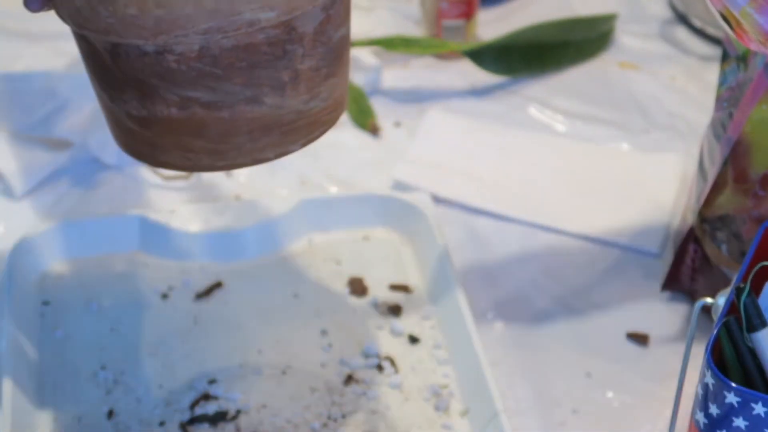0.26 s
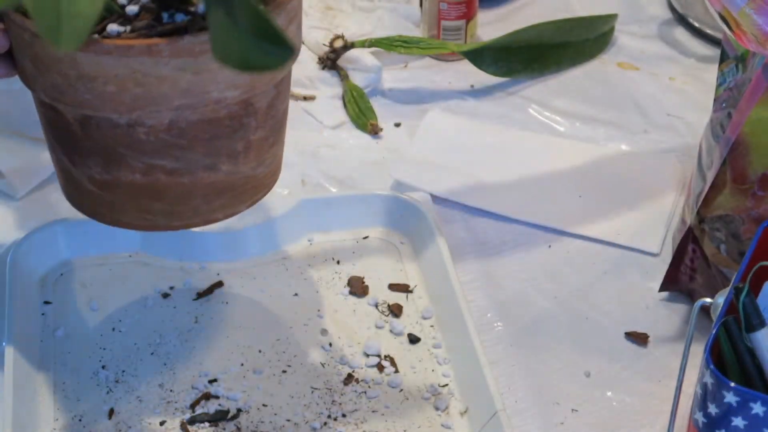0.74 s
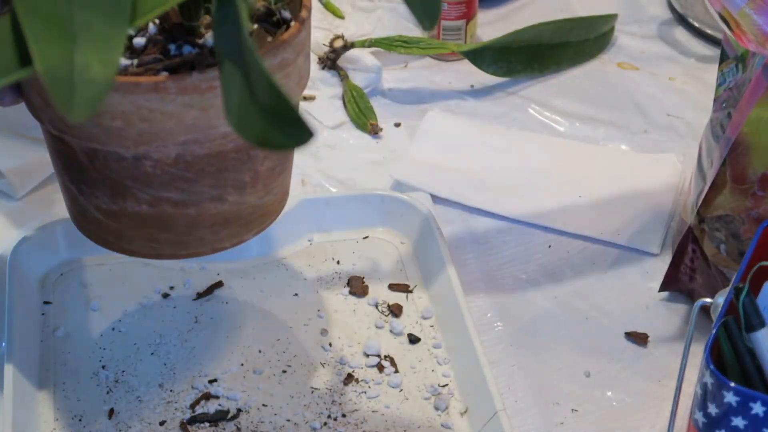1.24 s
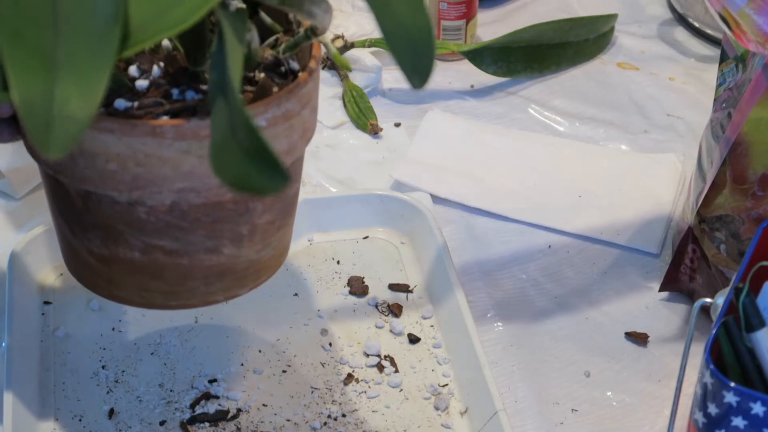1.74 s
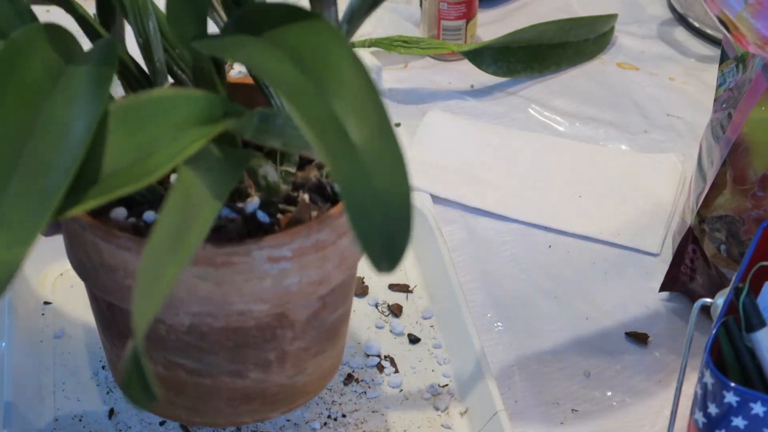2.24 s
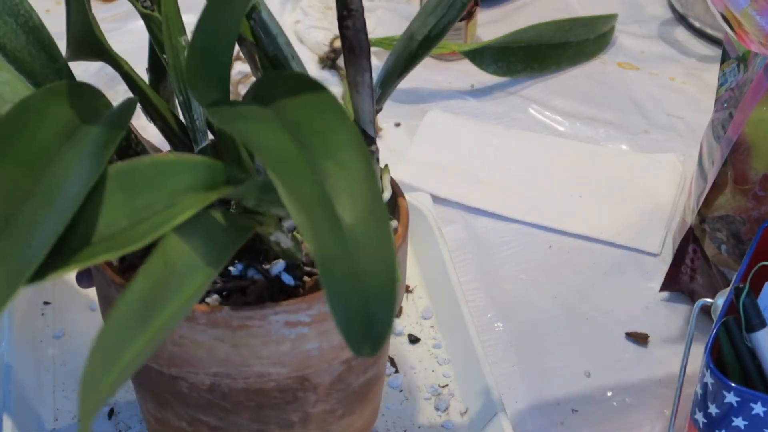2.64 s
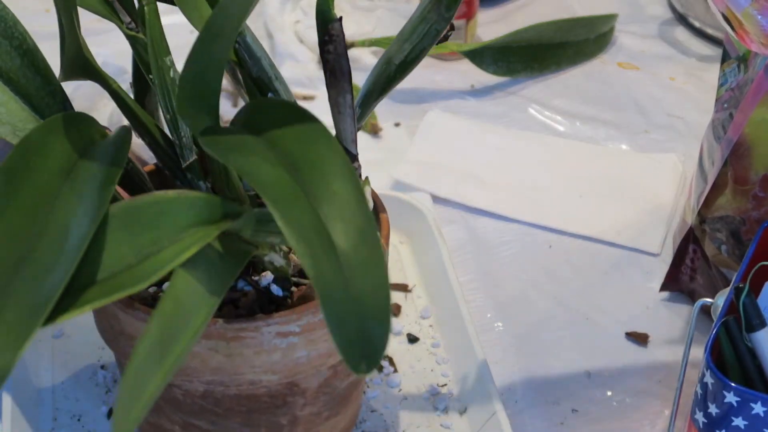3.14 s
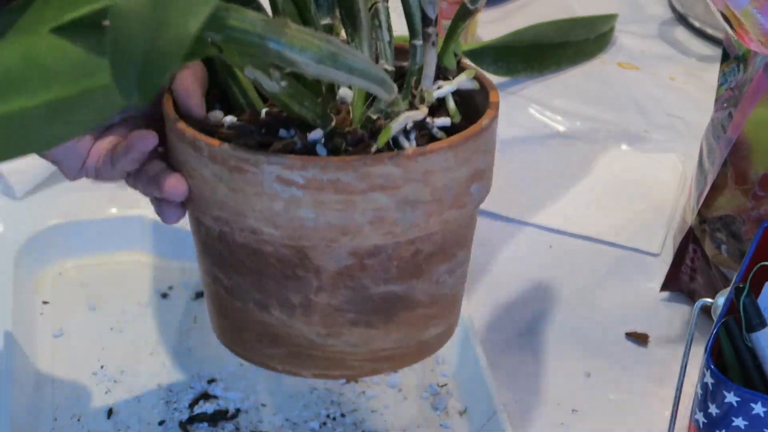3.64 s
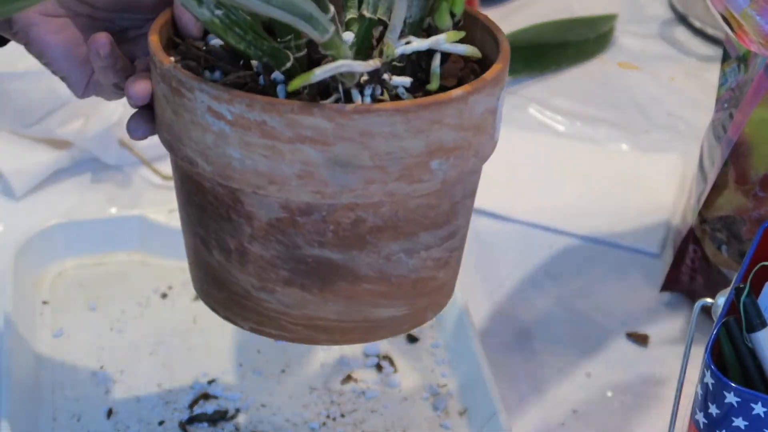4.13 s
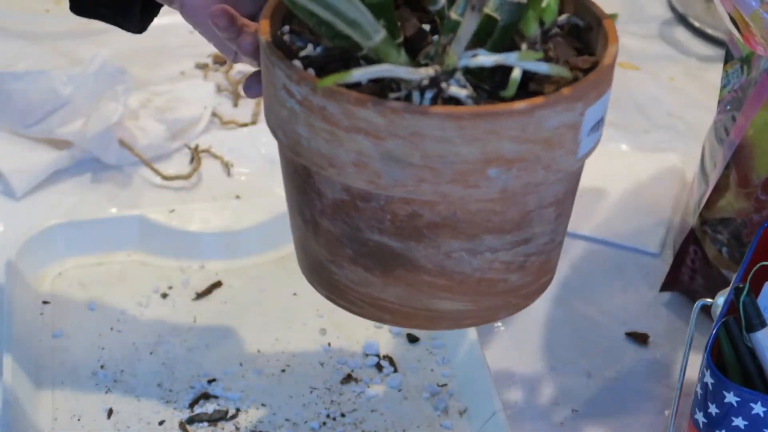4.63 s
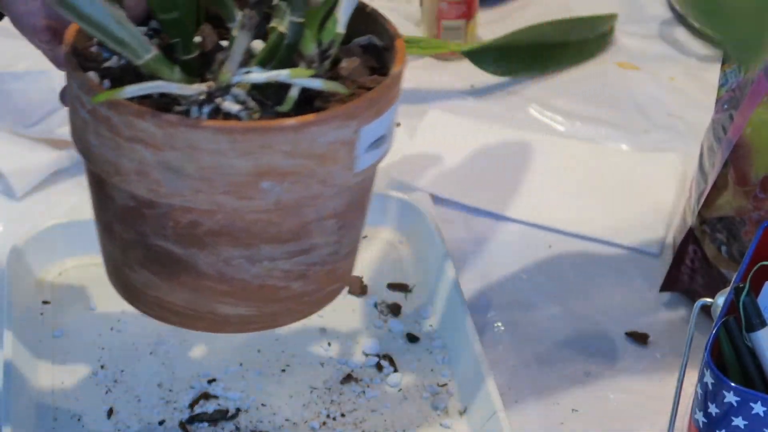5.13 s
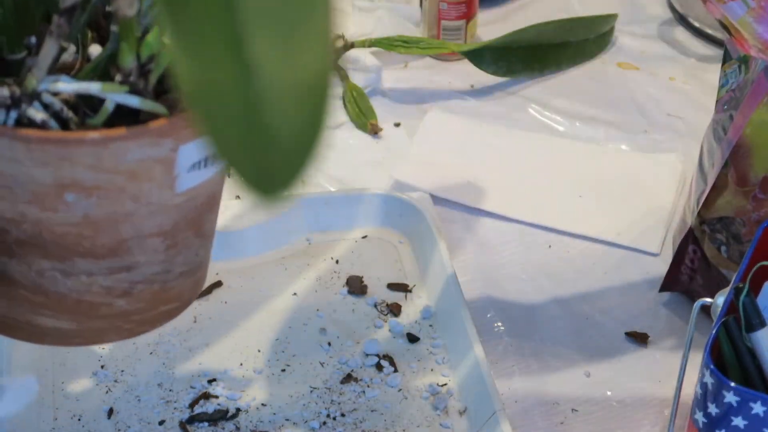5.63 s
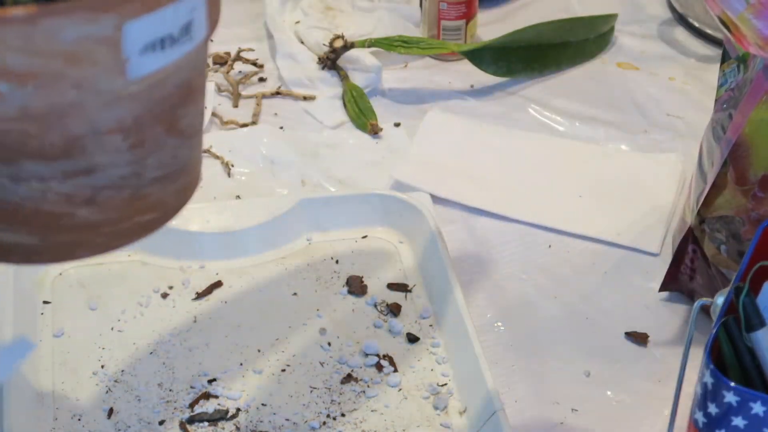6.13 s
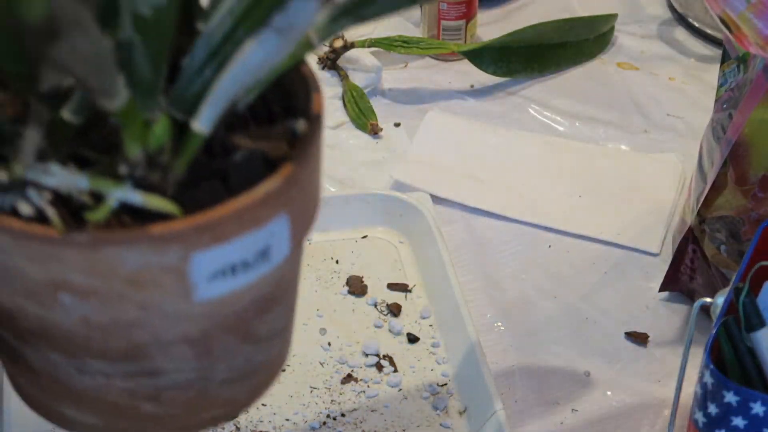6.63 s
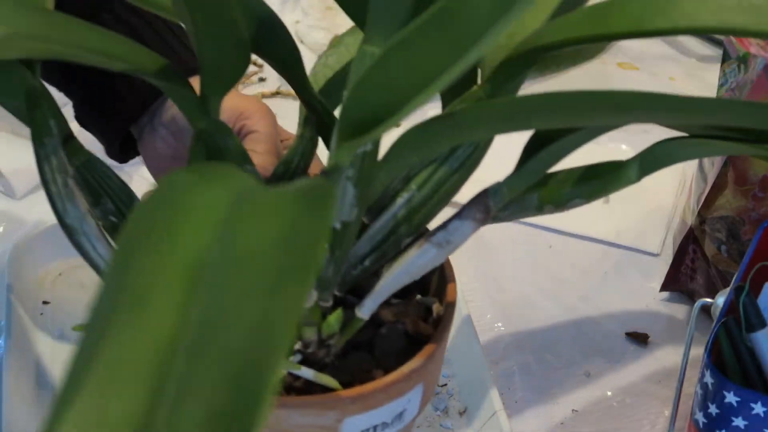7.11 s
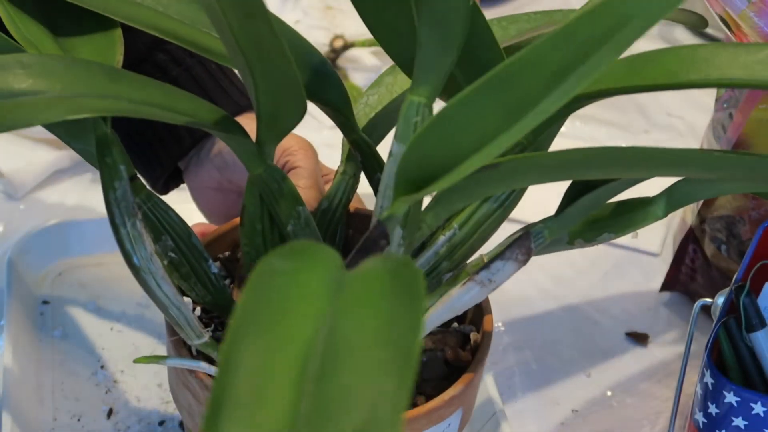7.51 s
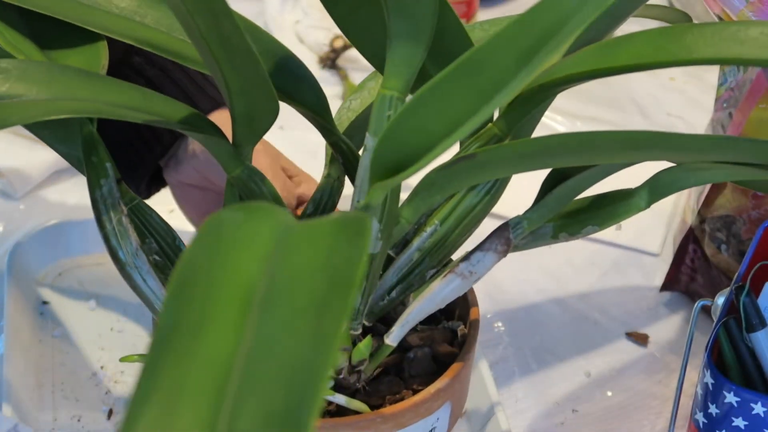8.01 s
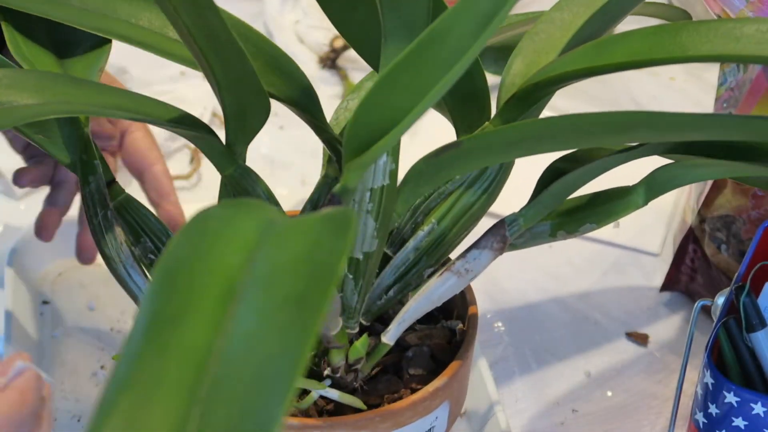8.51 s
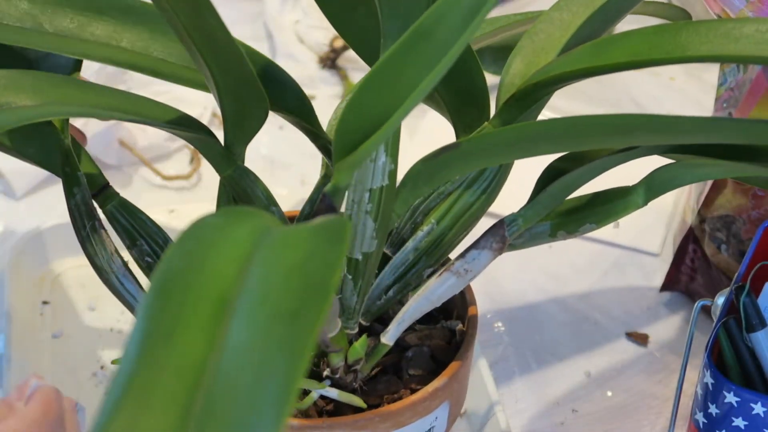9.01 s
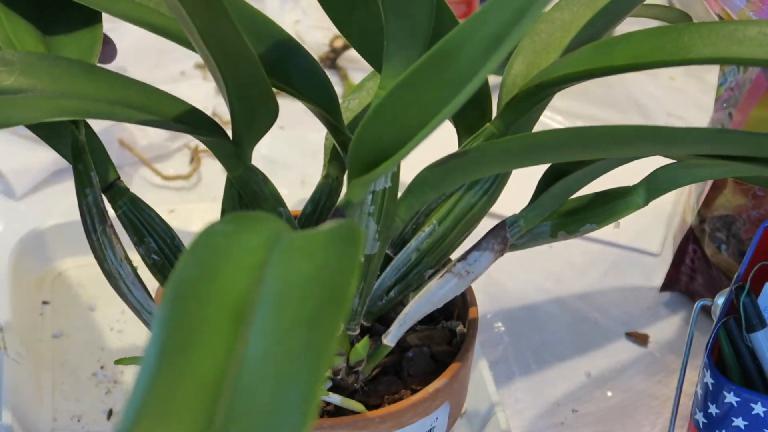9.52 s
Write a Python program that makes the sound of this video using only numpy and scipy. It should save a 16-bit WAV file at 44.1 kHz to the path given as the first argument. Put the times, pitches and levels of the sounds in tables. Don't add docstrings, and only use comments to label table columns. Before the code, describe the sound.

In a small room with a steady fan whirr and low mains hum, faint leaf brushes come first. A clay pot bumps and grates on a thin gritty plastic tray, then is lifted with small rattles and knocks. After a quiet gap it is set down with a rough scrape and two hard, bright clacks, leaving a few ticks and hum. Close stereo microphone.

```python
import sys
import numpy as np
from scipy import signal
from scipy.fft import rfft, irfft, next_fast_len
from scipy.io import wavfile
from scipy.ndimage import uniform_filter1d, map_coordinates

SR = 44100
rng = np.random.default_rng(int(sys.argv[2]) if len(sys.argv) > 2 else 0)


def invert_db(level):
    return 10 ** (np.asarray(level, dtype=float) / 20)


def put_to_file(sound):
    columns = np.atleast_2d(sound).T
    safe = np.clip(columns, -1, 1)
    whole_steps = np.round(safe * 32767)
    wavfile.write(sys.argv[1], SR, whole_steps.astype(np.int16))


N = 430416


def unit(x):
    return x / np.sqrt(np.mean(x ** 2) + 1e-20)


def along(points, hz):
    f, v = np.transpose(points)
    return np.interp(np.log(hz + 1), np.log(f + 1), v)


def wobble(rate_hz):
    coarse = np.arange(0, N + 32, 32)
    knots = rng.standard_normal(int(N * rate_hz / SR) + 4)
    return np.interp(np.arange(N), coarse, map_coordinates(knots, [coarse * rate_hz / SR]))


def filtered(x, response):
    m = next_fast_len(N + SR // 2)
    return irfft(rfft(x, m) * response(np.fft.rfftfreq(m, 1 / SR)), m)[..., :N]


def coloured(x, spectrum, body=()):
    hz = np.fft.rfftfreq(8192, 1 / SR)
    lifts_db = sum(lift / (1 + (2 * (hz - centre) / width) ** 2) for centre, width, lift in body)
    db = along(spectrum, hz) + lifts_db
    cepstrum = irfft(np.log(invert_db(np.maximum(db, -80))))
    cepstrum[1:4096] *= 2
    cepstrum[4097:] = 0
    return signal.fftconvolve(x, irfft(np.exp(rfft(cepstrum)))[:4096])[:N]


def patchy(x, depth_db, bins=5, frames=9):
    z = signal.stft(x, nperseg=512)[2]
    field = uniform_filter1d(rng.standard_normal(z.shape), bins, axis=0)
    field = uniform_filter1d(field, frames, axis=1)
    return signal.istft(z * invert_db(depth_db * unit(field)), nperseg=512)[1][:N]


def grains(rate_hz, spread_db, clump_db, smooth):
    size_db = spread_db * np.minimum(rng.exponential(size=N), 3)
    slips = (rng.random(N) < rate_hz / SR) * rng.choice([-1, 1], N) * invert_db(size_db)
    clumps = invert_db(clump_db * np.clip(wobble(60), -1.5, 1.5))
    return clumps * (unit(slips) + smooth * rng.standard_normal(N))


def strokes(rows, rise_db_s, stop_db_s, fade_db_s=0, second=False):
    out = np.zeros(N)
    for start_s, length_s, db, sag_db, *over_db in rows:
        first = round((start_s - 40 / rise_db_s) * SR)
        last = min(N, round((start_s + length_s + 40 / stop_db_s) * SR))
        i = np.arange(first, last)
        t = i / SR - start_s
        level_db = db + second * sum(over_db) + rise_db_s * np.minimum(t, 0)
        level_db -= (sag_db / length_s + fade_db_s) * np.clip(t, 0, length_s)
        level_db -= stop_db_s * np.maximum(t - length_s, 0)
        out[i] = np.maximum(out[i], invert_db(level_db))
    return uniform_filter1d(out, size=130)


def burst(noise, envelope, lo_hz, hi_hz, order):
    band = signal.butter(order, [lo_hz, hi_hz], "bandpass", fs=SR)
    click = np.linalg.norm(envelope) * (np.arange(len(noise)) == 48)
    x = np.array([noise * envelope, click])
    return signal.lfilter(*band, x) / np.std(signal.lfilter(*band, noise))


# start in seconds, peak in dB, pitch in Hz, thud in dB, crack in dB.
TICKS = [(3.0635, -27, 910, -18, -4), (3.2904, -32, 2070, -27, -13), (3.3134, -29, 2120, -28, -15),
         (3.3635, -34, 2120, -41, -11), (3.3972, -27, 1180, -20, -5.5), (3.6035, -28.5, 1500, -8, -8),
         (3.5753, -32.5, 2000, -7, -15), (7.8128, -26, 870, -7, -19), (8.0648, -18.5, 2050, -20, -16),
         (2.6269, -32, 980, -7.5, -36), (4.1939, -27.5, 1100, -28, -22), (4.5305, -34, 1460, -9, -24),
         (7.0184, -34.5, 1480, 3, -21), (7.5012, -25, 1970, -4.5, -25.5), (7.8004, -12, 1700, -4.5, -4.5),
         (8.0523, -6, 1900, -17, -10.5), (8.2775, -30, 2600, -27, -9.5), (8.364, -31, 2100, -37, -4),
         (8.3748, -18, 2300, -36, -20)]
# start in seconds, peak in dB, pitch in Hz, thud in dB, crack in dB.
KNOCKS = [(2.4885, -26, 900, -5, -20), (2.7029, -39, 990, -14, 4), (3.5955, -23.5, 863, -34, -3.5),
          (4.6264, -31.5, 930, -13, -25), (5.1675, -30, 2700, -5, -12), (4.7753, -22, 1310, -5, -11),
          (4.8572, -19.5, 1580, -9, -14.5), (5.1226, -37, 1210, -6, -12), (5.7078, -37, 1350, -4.5, -30),
          (5.909, -41, 915, -22, 5.5), (6.099, -38, 875, 5.5, -23), (8.4662, -33, 2700, -30, -8)]
# start in seconds, peak in dB, pitch in Hz, thud in dB, crack in dB.
BUMPS = [(2.5125, -22.5, 1230, -5, -8), (2.5507, -22.5, 900, 1.5, -12), (1.505, -48, 910, 9.5, -33),
         (3.2264, -35.5, 2140, -5, -22), (3.4796, -29, 975, -30, -5), (7.743, -31, 1870, -18, -20),
         (1.9102, -44.5, 1250, 4, -17), (2.309, -37, 900, -4, -25), (2.3165, -36.5, 1530, -4, -18),
         (2.5745, -40, 1390, -15, -18), (4.5785, -35, 1300, -8, -18), (3.0734, -27.5, 1900, -24, 4),
         (4.131, -31.5, 1270, 2, -30), (4.3955, -36, 1200, -1, -28), (4.5495, -39, 1390, 7, -16),
         (4.7167, -33.5, 950, 4, -29), (4.9582, -42.5, 830, 12, -18), (7.18, -44, 1400, 0, -24),
         (7.345, -45, 2300, -8, -24), (5.224, -29, 1300, -26, -50), (7.4495, -36, 1500, 2, -11),
         (7.7045, -33, 1800, -20, -24), (8.4078, -38, 2190, -16, -18), (9.5474, -37.5, 1800, -9, -20),
         (9.5555, -42, 1800, 1.5, -20)]
# start in seconds, peak in dB, pitch in Hz, thud in dB, crack in dB.
RATTLE = [(2.406, -49, 1390, -15, -25), (2.431, -39, 960, -15, -25), (2.733, -47, 900, -10, -25),
          (4.103, -45, 800, -13, -33), (4.406, -32, 1200, -9, -22), (4.419, -37, 1300, 2, -28),
          (4.428, -38, 1500, -6, -25), (4.444, -27.5, 1100, -5, -18), (4.573, -41, 1900, -11, -12),
          (4.587, -29, 1000, -3.5, -25), (4.606, -31, 850, -0.5, -28), (4.628, -42, 2900, -25, -20),
          (4.65, -43, 2200, -15, -25), (4.7, -46, 3100, -28, -22), (4.748, -33, 900, -3, -28),
          (4.797, -34, 2400, -15, -24), (4.876, -43, 4080, -30, -15), (5.137, -38, 2500, -18, -20),
          (5.187, -31, 1300, -16, -16), (5.243, -37, 2480, -17, -20), (3.589, -31, 3360, -20, -4),
          (3.518, -31, 900, -10, -25), (7.26, -46, 3000, -18, -15), (7.7835, -23, 2300, -19, -20)]
# frequency in Hz, level in dB, t60 in seconds.
POT_MODES = [(396, -6, 0.036), (740, 0.5, 0.061)]


def knocks():
    # contacts, snap dB, chatter over snap dB, pot ring dB
    kinds = [(TICKS, 0, -15.5, -8.5), (KNOCKS, 1.2, -7, -11), (BUMPS, -3, 0.79, -17),
             (RATTLE, -8, -2.7, -19)]
    ring_follows_thud = 0.6
    out, t = np.zeros((2, N + SR)), np.arange(SR // 8) / SR
    ring = sum(invert_db(level_db - 60 * t / t60_s) * np.sin(2 * np.pi * hz * t)
               for hz, level_db, t60_s in POT_MODES)
    chatter_env = invert_db(-60 * t / .026) * (1 - np.exp(-t / .0015))
    thud_env = invert_db(-60 * t / 0.038)
    crack_env = invert_db(-60 * t / .01) * (1 - np.exp(-t / .0007))
    for rows, snap_db, chatter_db, ring_db in kinds:
        for start_s, db, hz, thud_db, crack_db in rows:
            noise = rng.standard_normal((3, len(t)))
            cycles = hz * (t - .0011)
            snap = np.sin(2 * np.pi * cycles) * np.exp(-(cycles / .6) ** 2)
            snap *= 1 - np.exp(-(t / .0002) ** 2)
            chatter = burst(noise[0], chatter_env, hz / 1.8, hz * 2.1, order=2)
            thud = burst(noise[1], thud_env, hz / 6, hz / 1.31, order=2)
            edge_hz = 5.5 * hz * invert_db(.25 * (db + 20) + .3 * (crack_db + 18))
            crack = burst(noise[2], crack_env, 2400, np.clip(edge_hz, 5500, 14500), order=4)
            hit = snap + invert_db(chatter_db) * chatter + invert_db(crack_db - 6.5) * crack * [[1], [-1.6]]
            whole = invert_db(db + snap_db + 3.0) * hit + invert_db(db + thud_db) * thud
            whole = whole + invert_db(db + ring_db + ring_follows_thud * thud_db) * ring
            out[:, round(start_s * SR):][:, :len(t)] += whole
    return out[:, :N]


# start in seconds, frequency in Hz, level in dB, t60 in seconds.
NOTES = [(1.215, 2000, -51, .09), (1.255, 1800, -44, 0.09), (1.235, 5950, -46, 0.06),
         (3.064, 860, -30, 0.044), (3.078, 890, -38, .06), (3.09, 2780, -36.5, .11),
         (3.083, 3900, -42, .06), (3.097, 3700, -37, .05), (3.157, 1000, -32.5, .07),
         (4.776, 640, -29, 0.11), (4.776, 946, -30, 0.076), (4.776, 3000, -44, .05),
         (4.776, 4200, -27, .02), (4.858, 614, -26, .05), (4.858, 2000, -25, 0.032),
         (4.858, 3500, -28, 0.019), (4.857, 4540, -27, 0.021), (7.019, 400, -30, 0.11),
         (7.036, 460, -36, 0.12), (7.019, 710, -33, 0.16), (7.02, 1530, -30, 0.04), (7.083, 2120, -45, .05),
         (7.247, 1870, -37, 0.026), (7.801, 742.5, -21.5, 0.13), (7.812, 750, -24.5, 0.07),
         (7.801, 1500, -30, 0.11), (8.408, 2110, -29, .03), (8.411, 2900, -36, .03),
         (7.649, 1510, -31, .07), (7.052, 470, -35, .12), (7.133, 230, -37, .06), (7.81, 90, -38, 0.32),
         (2.52, 330, -27, .1), (2.8, 300, -30, .05), (8.376, 3040, -29, .02), (4.42, 1370, -33, .03),
         (4.407, 2200, -41, 0.028), (4.55, 710, -26.5, .04), (4.576, 2400, -36, .03),
         (4.573, 4700, -42, .015), (4.627, 3200, -32, 0.014), (4.858, 1330, -23.5, 0.033),
         (4.776, 1303, -28, .04), (5.226, 5200, -40, .02), (5.243, 2500, -35, 0.045),
         (1.408, 4500, -50, .04), (1.238, 2500, -49, .05), (9.465, 3100, -52, .06), (9.543, 1680, -39, .02),
         (9.548, 1800, -31.5, .022), (9.555, 1800, -33, .022)]


def notes():
    out, t = np.zeros(N + SR), np.arange(SR // 5) / SR
    for start_s, hz, db, t60_s in NOTES:
        tone = invert_db(db - 60 * t / t60_s) * (1 - np.exp(-t / 0.00083)) * np.sin(2 * np.pi * hz * t)
        out[round(start_s * SR):][:len(t)] += tone
    return out[:N]


# full level from in seconds, length in seconds, drag in dB,
# sag over the stroke in dB, fizz over drag in dB.
DRAG = [(3.064, 0.0057, -33.5, -6.5, -11), (3.074, 0.016, -32.5, 5, -10), (3.095, 0.059, -41.5, 0.5, -9),
        (3.156, 0.02, -29.5, 3.5, -10), (3.179, 0.045, -29.5, 10, -9.5), (3.227, 0.043, -33.5, 9, -12),
        (3.275, 0.085, -42.5, 0.5, -9), (3.364, 0.045, -42, 3, -6.5), (7.03, 0.081, -39.5, 32, -6),
        (7.452, 0.039, -28, -4, -10), (7.501, 0.045, -27.5, 14.5, -12.5), (7.545, 0.045, -40, -0.5, -13),
        (7.596, 0.046, -32.5, 1, -12), (7.651, 0.053, -31.5, 3, -12.5), (7.705, 0.045, -31, 5, -13),
        (7.743, 0.016, -29.5, -1, -13.5), (7.762, 0.029, -29.5, 9, -12.5), (8.05, .003, -43, -2, -8),
        (8.372, 0.053, -40.5, 1.5, -3.5), (8.435, 0.038, -47.5, -7, -9)]
# frequency in Hz, level in dB.
GRIT = [(180, -38), (300, 10), (529, 4), (813, -1), (1400, 3.5), (2080, 6), (2930, -18), (4500, -20),
        (5850, -30), (9900, -120)]
# frequency in Hz, level in dB.
FIZZ = [(1760, -2.5), (3000, 5), (3760, 5), (6130, 2), (9260, -7), (11900, -6.5), (13900, -8.5),
        (15500, -25)]
# frequency in Hz, width in Hz, lift in dB.
CLAY = [(818, 185, 14), (1700, 130, 6.5), (1450, 180, 2), (2050, 500, 11), (2450, 130, 11), (3560, 180, 5),
        (6060, 400, -0.5), (11800, 910, 3)]
# frequency in Hz, width in Hz, lift in dB.
CLAY_TIPPED = [(900, 430, 16), (1210, 150, 4.2), (1900, 600, 11.4), (2300, 430, 13.6), (2585, 240, 20),
               (3700, 250, 7), (4300, 250, 5), (6300, 400, 3)]
# time in seconds, share from -1 (pressed flat) to 1 (on its rim).
TIP = [(3.05, 1), (3.21, 1), (3.26, .8), (3.4, .8), (7.0, 0.2), (7.5, -0.026), (7.62, -0.042),
       (7.65, -0.82), (7.7, -.6), (7.74, -.2), (7.78, .5), (8.4, 0.29)]


def scrape():
    pressed_pitch_ratio = .82
    rise_db_s, stop_db_s = 1700, 1600
    grit = grains(rate_hz=1600, spread_db=2.6, clump_db=2.2, smooth=.6)
    tip = np.clip(np.interp(np.arange(N) / SR, *np.transpose(TIP)), -1, 1)
    flat = [(pressed_pitch_ratio * hz, width_hz, lift_db) for hz, width_hz, lift_db in CLAY[1:]]
    flat += CLAY[:1]
    body = (1 - abs(tip)) * unit(coloured(grit, GRIT, CLAY))
    body += np.maximum(tip, 0) * unit(coloured(grit, GRIT, CLAY_TIPPED))
    body += np.maximum(-tip, 0) * unit(coloured(grit, GRIT, flat))
    body = unit(patchy(body, depth_db=2.4, bins=3, frames=5))
    fizz = unit(patchy(coloured(grit, FIZZ, CLAY), depth_db=1.5))
    drag_gain = invert_db(-3.5) * strokes(DRAG, rise_db_s, stop_db_s)
    fizz_gain = invert_db(1.0) * strokes(DRAG, rise_db_s, stop_db_s, second=True)
    return drag_gain * body + fizz_gain * fizz


# full level from in seconds, length in seconds, drum in dB,
# sag in dB, edge over drum in dB.
LOAD = [(1.922, 0.042, -41.5, 23, -22), (2.322, 0.024, -38.5, 20, 6.5), (2.36, 0.14, -47, 6, -4),
        (2.495, 0.088, -31.5, 3, 7.5), (2.605, 0.22, -44.5, 13, 7.5), (2.836, 0.035, -45, 9, 2.5),
        (3.486, 0.14, -40.5, 5, 1), (3.6, 0.086, -35.5, 9, -5), (3.66, 0.42, -50, 3.5, 8),
        (4.134, 0.24, -32, 40, 0.5), (4.403, 0.15, -37.5, 13.5, 3.5), (4.554, 0.23, -40.5, 12, 5.5),
        (4.787, 0.026, -25, 30, 0), (4.872, 0.18, -33.5, 30, -26), (5.15, .02, -47, -6, 5.5),
        (5.172, 0.44, -38, 32, 7), (5.742, 0.13, -58, -7, 5), (6.025, 0.11, -41.5, -3.5, 3.5),
        (6.115, 0.24, -42.5, 29, 1), (7.03, 0.24, -50.5, -1.5, 5), (7.268, 0.21, -49.5, -1, 7),
        (7.455, 0.065, -33, 16, 3.5), (7.6, 0.14, -51.5, -5, 12.5)]
# frequency in Hz, level in dB.
DRUM = [(41, -37), (70, 2.5), (208, 2.5), (347, 0.5), (586, -4.5), (700, -10.5), (1000, -12.5), (1300, -57),
        (2200, -120)]
# frequency in Hz, level in dB.
EDGE = [(350, -16.5), (600, -11), (693, 8.5), (1160, 3.5), (1840, 1.5), (2720, -4.5), (7000, -25),
        (9100, -41), (15400, -120)]
# frequency in Hz, width in Hz, lift in dB.
TRAY = [(214, 42, 4.8), (290, 28, 0.65), (620, 30, 3), (1310, 12, 13), (1820, 400, 0.46), (3100, 160, 1.5)]


def tray():
    rise_db_s, stop_db_s, edge_fade_db_s = 890, 1900, 25
    slips = grains(rate_hz=550, spread_db=2.5, clump_db=1.5, smooth=1)
    ticks = grains(rate_hz=500, spread_db=2.1, clump_db=2, smooth=.75)
    drum = unit(patchy(coloured(slips, DRUM, TRAY), depth_db=1.8))
    edge = unit(patchy(coloured(ticks, EDGE, TRAY), depth_db=1.8))
    drum_gain = invert_db(-1.0) * strokes(LOAD, rise_db_s, stop_db_s)
    edge_gain = invert_db(-6.5) * strokes(LOAD, rise_db_s, stop_db_s, edge_fade_db_s, second=True)
    return drum_gain * drum + edge_gain * edge


# full level from in seconds, length in seconds, brush in dB, sag in dB.
BRUSH = [(1.2, 0.03, -48.5, 1.5), (1.235, 0.033, -48.5, 4), (1.285, 0.1, -59, 5), (1.402, 0.042, -53, 12),
         (1.502, 0.079, -60, 12), (1.614, 0.083, -53.5, 16), (1.7, 0.086, -63, -8.5), (2.1, 0.42, -74, -11),
         (3.7, 0.063, -64, -6), (3.77, .1, -64, 11), (3.9, .06, -64, 1), (3.972, .07, -58.5, 8),
         (4.1, 0.083, -61, 1), (4.22, .1, -61.5, 0), (4.33, .09, -59, 1), (4.52, 0.22, -64, -2),
         (4.43, 0.087, -60.5, -4), (5.345, 0.13, -57, 8), (5.48, 0.16, -62.5, 6), (5.68, .2, -64.5, 2),
         (5.904, 0.079, -51.5, 15), (6.01, 0.087, -58, -15.5), (6.084, 0.17, -43, 39), (6.3, 1, -69, -2.5),
         (8.9, 0.61, -64, 9), (9.548, 0.1, -58, 26)]
# frequency in Hz, level in dB.
LEAF = [(880, -35), (1500, -38), (1790, -12.5), (2050, -7), (4180, -10), (12400, -20), (14500, -29),
        (15500, -80)]
# frequency in Hz, width in Hz, lift in dB.
BLADES = [(1800, 29, 13.2), (4470, 500, 2.6), (5860, 720, 1.8)]
# full level from in seconds, length in seconds, shift in dB, sag in dB.
CHIPS = [
    (3.48, 0.17, -71, -9),
    (3.62, 0.036, -52, 21),
    (4.5, 0.43, -66, -6.5),
    (4.872, .04, -62, 12),
    (5.185, 0.15, -56, 10),
]
# frequency in Hz, level in dB.
BARK = [(1470, -63), (2500, 4), (6560, -12), (10100, -38), (10700, -55), (12000, -15), (15600, -62),
        (22000, -120)]


def leaves():
    rub = grains(rate_hz=1200, spread_db=4, clump_db=2.2, smooth=1.1)
    shift = grains(rate_hz=530, spread_db=3, clump_db=3, smooth=0.5)
    brush = unit(patchy(coloured(rub, LEAF, BLADES), depth_db=1.5))
    chips = unit(patchy(coloured(shift, BARK), depth_db=1.5))
    brush_gain = strokes(BRUSH, rise_db_s=760, stop_db_s=410)
    chip_gain = invert_db(5.0) * strokes(CHIPS, rise_db_s=1200, stop_db_s=1500)
    return brush_gain * brush + chip_gain * chips


# frequency in Hz, ratio in dB.
WIDE = [(100, -50), (300, -20), (1000, -6), (2000, 1), (4000, 7.5), (9000, 5.5), (14000, 7.5)]


def ports(x, aside_db, scatter_db):
    turn = rng.standard_normal(30)
    turn_hz = np.linspace(0, SR / 2, len(turn))

    def side_response(hz):
        lead = invert_db(aside_db) * np.exp(-1.75j) / (1 + (hz / 4500) ** 4)
        swing = 1j * np.tanh(3 * np.interp(hz, turn_hz, turn))
        scatter = invert_db(scatter_db) * swing / (1 + (3500 / (hz + 1)) ** 2)
        return invert_db(along(WIDE, hz)) * (lead + scatter)

    return np.array([x, filtered(x, side_response)])


# frequency in Hz, t60 in seconds.
ROOM = [(100, 1), (300, 0.4), (700, 0.67), (1800, 0.43), (5000, 0.48), (12000, 0.23)]
# delay in seconds, level in dB.
WALLS = [(.0017, -47), (.0043, -16), (0.0117, -22), (0.0126, -10), (0.022, -24)]
# frequency in Hz, level in dB.
SOFT = [(100, -1), (700, 1), (2000, -2), (3000, -5), (5000, -1), (12000, 1.5)]


def room(x, wall_db, tail_db):
    out, step = np.zeros((2, N + 2 * SR)), SR // 4
    padded = np.pad(x, (0, step))
    for i in range(0, N, step):
        hz, t, z = signal.stft(rng.standard_normal((2, SR // 2)), SR, nperseg=256)
        decay_db = along(SOFT, hz)[:, None] - 60 * t / along(ROOM, hz)[:, None]
        tail = signal.istft(z * invert_db(decay_db), SR, nperseg=256)[1]
        tail_s = np.arange(tail.shape[1]) / SR
        tail *= invert_db(tail_db) / np.linalg.norm(tail[0]) * np.clip(tail_s / 0.02, 0, 1)
        tail *= 1 + 0.7 * invert_db(-290 * tail_s)
        for delay_s, db in WALLS:
            tail[:, round(delay_s * SR)] += invert_db(db + wall_db) * np.array([1, rng.uniform(-1.3, 1)])
        wet = signal.fftconvolve(padded[None, i:i + step], tail, axes=1)
        out[:, i:i + wet.shape[1]] += wet
    return np.array([out[0, :N], filtered(out[1, :N], lambda hz: invert_db(along(WIDE, hz)))])


# multiple of the shaft rate, mid in dB, side in dB.
FAN = [(12, -66, -82), (14, -53, -65), (24, -74, -85), (28, -72, -85), (36, -68, -80), (63, -72, -82),
       (64, -71, -79), (67, -67, -72), (68, -67, -69), (71, -75, -79), (72, -76, -74), (76, -76, -78),
       (80, -86, -73), (111, -81, -74)]
# frequency in Hz, level in dB.
MAINS = [(36, -63), (60, -65), (120, -54.5), (180, -65), (360, -72)]
# frequency in Hz, level in dB.
AIR = [(12, -10.5), (20, -3), (49, -20), (80, -4.5), (207, -7), (289, -6.5), (342, -10.5), (393, -15),
       (746, -16), (985, -19), (1410, -19), (10500, -42.5), (15500, -51)]
# frequency in Hz, level in dB.
AIR_SIDE = [(12, -41), (20, -42), (112, -11.5), (259, -5), (282, -3), (534, -9), (1410, -11.5), (1920, -12),
            (8880, -28.5), (15500, -37)]
# frequency in Hz, width in Hz, lift in dB.
HOLLOW = [(102, 8.9, 6.2), (262, 67, 4.2), (409, 106, 7.8), (624, 80, 7.1), (794, 70, 6.2), (1390, 57, 5.8)]


def hum():
    shaft_hz, air_db = 20.6, -46
    t = np.arange(N) / SR
    turn = 2 * np.pi * shaft_hz * t + 0.021 * wobble(1.414)
    fan = np.zeros((2, N))
    for multiple, mid_db, side_db in FAN:
        gain = invert_db(np.array([[mid_db], [side_db]]) + 2.0 + np.sqrt(2) * wobble(6.7))
        fan += gain * np.sin(multiple * turn + rng.uniform(0, 8.33) + np.array([[0], [.7]]))
    mains = np.zeros(N)
    for hz, db in MAINS:
        mains += invert_db(db + 3.5 + 1.2 * wobble(3)) * np.sin(2 * np.pi * hz * t + rng.uniform(0, 7))
    mid = unit(patchy(coloured(rng.standard_normal(N), AIR, HOLLOW), depth_db=2.0))
    side = unit(patchy(coloured(rng.standard_normal(N), AIR_SIDE), depth_db=1.5))

    def from_left(hz):
        phase = np.exp(1.1j * np.clip(hz / 900, 0, 1))
        return invert_db(along(WIDE, hz) - 11.0) * phase / (1 + (hz / 3500) ** 4)

    side += filtered(mid, from_left)
    return fan + [mains + invert_db(air_db - 2.0) * mid, invert_db(-26.0) * mains + invert_db(air_db - 6.5) * side]


def scene():
    hits, blows = knocks() + invert_db([[0], [-8.5]]) * notes()
    drag, load, brush = scrape(), tray(), leaves()
    near = ports(hits, aside_db=-4, scatter_db=0.5)
    near += ports(drag, aside_db=-9.5, scatter_db=-0.5)
    near += ports(load, aside_db=0.0, scatter_db=-1.0)
    near += ports(brush, aside_db=-7, scatter_db=-1.0)
    rubbing = invert_db(-9.0) * drag + invert_db(-4.0) * load + invert_db(-2.0) * brush
    mid, side = near + room(blows + rubbing, wall_db=-8.5, tail_db=-6) + hum()
    return np.array([mid + side, mid - side])


def top_cut(x):
    return signal.sosfilt(signal.butter(12, 15850, fs=SR, output="sos"), x)


def record(dry):
    top_hz, offset = 15650, .0004
    mix = filtered(dry, lambda hz: hz < top_hz) + offset
    return top_cut(mix)


dry = scene()
out = record(dry)
put_to_file(out)
```